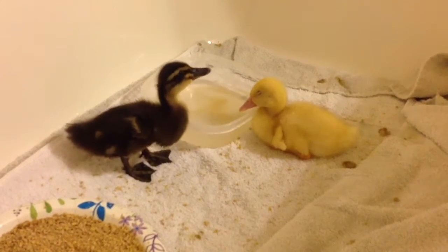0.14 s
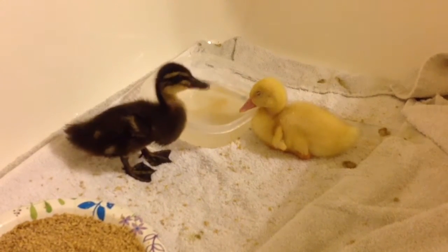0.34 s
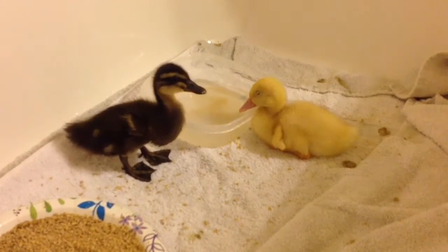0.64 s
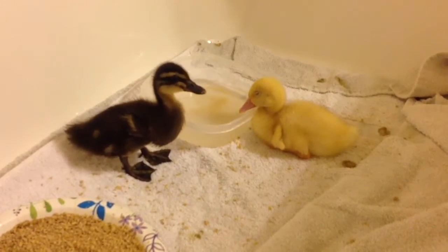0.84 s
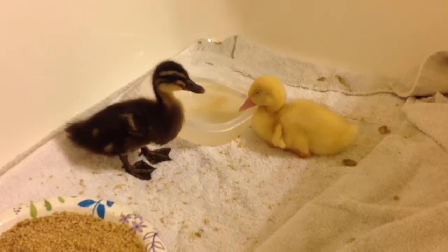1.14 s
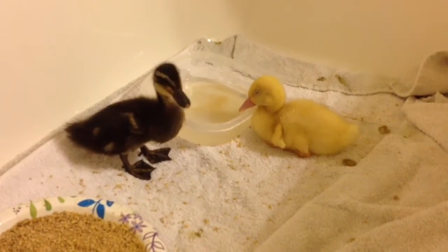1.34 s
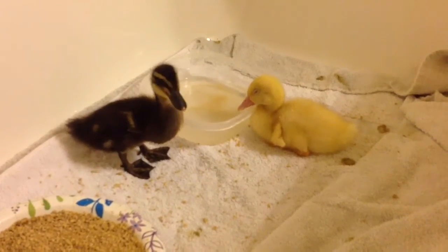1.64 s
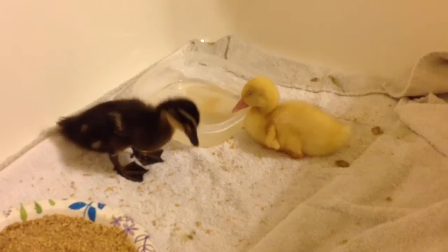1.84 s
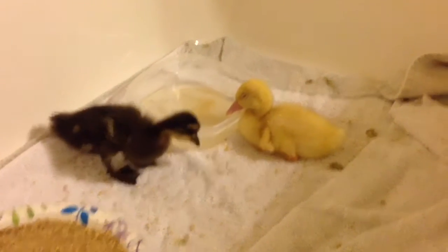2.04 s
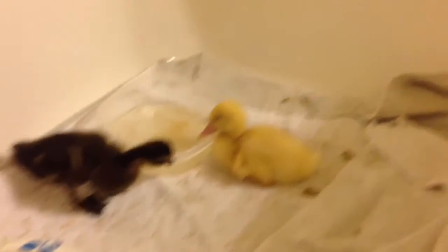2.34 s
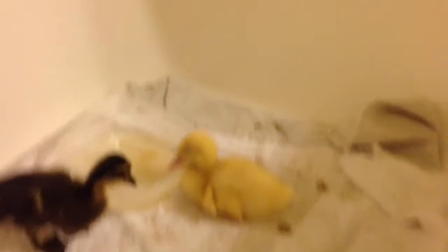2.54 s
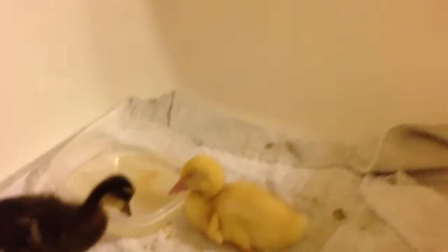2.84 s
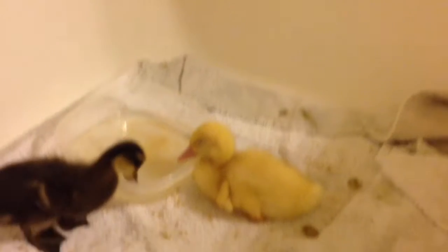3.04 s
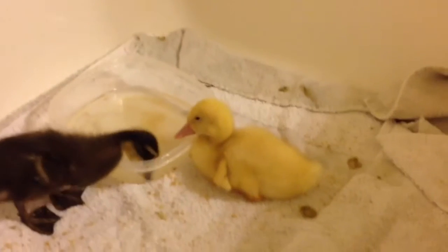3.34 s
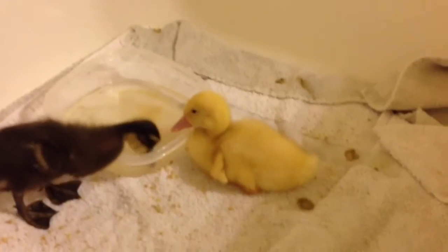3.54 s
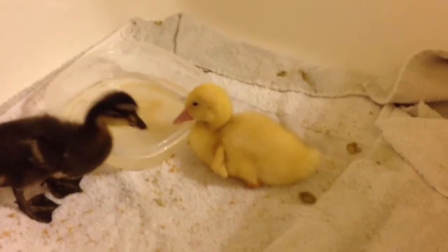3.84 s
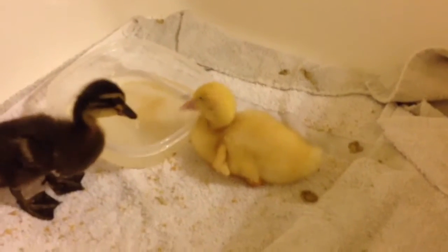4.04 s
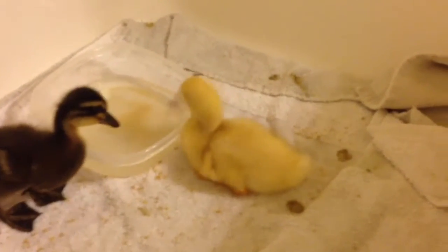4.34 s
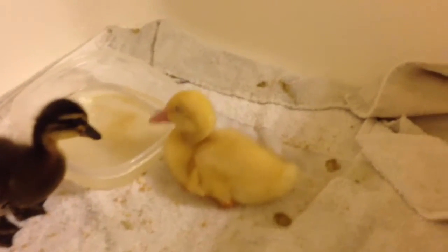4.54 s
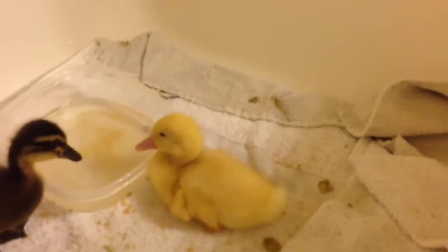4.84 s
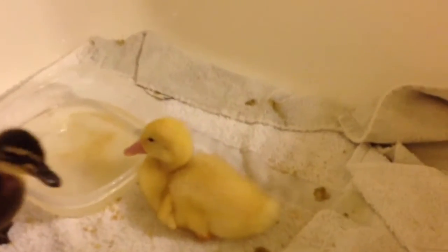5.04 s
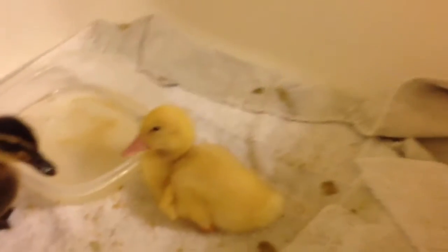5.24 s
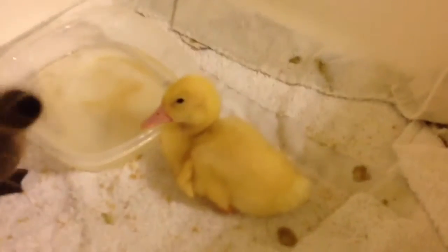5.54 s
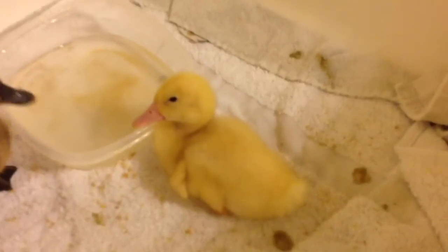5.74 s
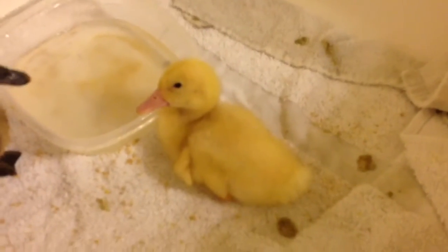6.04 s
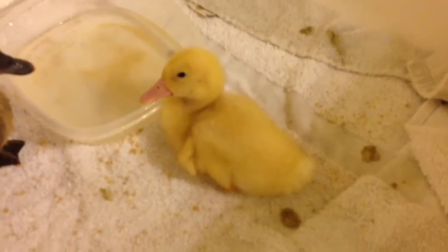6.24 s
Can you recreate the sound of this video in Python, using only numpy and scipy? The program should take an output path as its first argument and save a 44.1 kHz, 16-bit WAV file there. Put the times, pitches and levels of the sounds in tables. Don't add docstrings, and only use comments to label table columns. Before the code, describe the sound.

A duckling gives five quick high peeps in a small echoing tub, then a hard knock on a plastic dish and close cloth rubbing.

```python
import sys
import numpy as np
from scipy import signal
from scipy.io import wavfile
from scipy.ndimage import uniform_filter1d

SR = 44100
rng = np.random.default_rng(int(sys.argv[2]) if len(sys.argv) > 2 else 0)


def file_out(sig):
    cols = np.atleast_2d(sig).T
    lim = np.clip(cols, -1, 1)
    pcm = np.round(lim * 32767).astype(np.int16)
    wavfile.write(sys.argv[1], SR, pcm)


def gain_from_db(level_db):
    decades = np.asarray(level_db, float) / 20
    return 10 ** decades


N = 281622

# pitch_hz, t60_s
ROOM_DECAY = [(100, 0.48), (260, 0.69), (700, 0.49), (1840, 0.55), (3000, 0.49), (6000, 0.56),
              (12000, 0.54)]
# pitch_hz, level_db (per Hz)
HUSH_COLOUR = [(18, -53.5), (30, -29), (64, -18.5), (85, -27.5), (168, -5), (230, -10.5), (561, -13),
               (830, -18), (897, -18.5), (1970, -21), (3400, -21.5), (12900, -25), (15500, -29.5)]

# start_s, peak_db, pitch_hz
DRIPS = [(.3755, -45.5, 1640), (2.7654, -53, 2980), (2.8084, -51, 2160), (2.815, -30.5, 5320),
         (2.8684, -33, 4570), (2.8744, -30.5, 2840), (2.9203, -39, 2130), (2.9324, -41, 1900),
         (2.9716, -35, 3650), (2.9844, -36, 2970), (3.0021, -36, 2900), (3.0385, -39, 2250)]
# start_s, peak_db, pitch_hz
SCRAPES = [(4.0622, -43, 1330), (4.579, -43.5, 1130), (4.8296, -40.5, 1120), (4.909, -43, 1140),
           (4.9844, -42.5, 2870), (5.039, -46, 1010), (5.0844, -49, 3850), (5.2142, -40, 1300),
           (5.2641, -38.5, 1070), (5.2943, -38.5, 1450), (5.369, -42.5, 1760), (5.4244, -35, 1040),
           (5.482, -39, 1210), (5.5186, -41.5, 1120), (5.5453, -38.5, 7000), (5.5794, -35.5, 5000),
           (5.6993, -44, 1070), (5.416, -39, 1400), (5.64, -43, 1400)]
# start_s, peak_db, pitch_hz
TICKS = [(3.443, -56, 2340), (3.502, -42, 1430), (3.5982, -51, 4200), (3.6174, -53, 3020),
         (3.6213, -39, 5150), (3.6403, -44, 6850), (3.6716, -42, 2800), (3.6757, -41, 4890),
         (3.684, -38, 1330), (3.7065, -43, 5170), (3.7394, -47, 4420), (3.774, -43, 2210),
         (3.8398, -45, 2580), (3.8846, -39.5, 2640), (4.0392, -40, 2530)]

# start_s, length_s, level_db, push_db (extra mostly toward the end), overtone_db
PEEPS = [
    (1.325, .162, -42.5, 9, -.5),
    (1.624, .138, -37.3, 1, -.5),
    (1.908, .138, -39, -4, 2),
    (2.193, .137, -42.5, 2, 5),
    (2.468, .137, -35, -5, 0),
]
# scoop_s, first_top_hz, sag_hz, last_top_hz
TUNES = [
    (.04, 2800, 2350, 2794),
    (.028, 2927, 2630, 2876),
    (.028, 2905, 2810, 3030),
    (.033, 3160, 3030, 2870),
    (.029, 3234, 2900, 3242),
]
EFFORT_DB = [-13.5, -6.5, 0, -1, -4.5, -14]
SECOND_DB = [-21, -12, -26, -21, -15, -28]
PUSH_SHARE = [0, .15, 0, 0, .3, 1]
HUSK_DB = [3, 5, 1, -2, -5, -5]

# peak_s, swell_s, fade_s, peak_db, brightness_db
STROKES = [(2.065, .25, .09, -60.5, -1), (2.24, .035, .09, -57, -3), (2.41, .08, .1, -54, -1),
           (2.465, .2, .25, -54, 1.5), (2.69, .06, .04, -59, -3), (2.82, .03, .5, -69, 6),
           (3.075, .06, .02, -66, 0), (3.3, .05, .08, -64, -12), (3.39, .03, .25, -61, -13),
           (3.69, .3, .1, -61, -13), (3.82, .1, .15, -61, -9), (4.05, .03, .12, -56, -8),
           (4.16, .05, .15, -66, -18), (5.4, .15, .08, -55.5, -6), (5.5, .8, .3, -62, -16),
           (5.88, .2, .03, -70, -12)]
# time_s, pressure_db, brightness_db
DRAG = [
    (4.13, -70, 3),
    (4.34, -65, 0),
    (4.57, -62, 0),
    (4.85, -63, -1),
    (5.09, -57, 2),
    (5.19, -61, 0),
    (5.44, -59, 2),
    (5.58, -57, 4.5),
    (5.72, -63, 0),
    (5.765, -78, 0),
]
# offset_db, brightness_share
WEAVE = [(-1.5, -.55), (-.5, .2), (-6.3, .8), (-.5, 1.1)]
# pitch_hz, level_db (per Hz)
RUMBLE_COLOUR = [(60, -25.5), (110, -8), (160, -2.5), (260, -3), (450, -9), (700, -29.5)]
BODY_COLOUR = [(350, -23), (550, 2.5), (1050, 1.5), (1500, 2.5), (2200, -3.5), (2900, -3.5), (4000, -26),
               (6000, -33.5)]
SHEEN_COLOUR = [(1200, -16.5), (2200, -3), (3200, 2.5), (5000, -1.5), (6500, -7.5), (9000, -22.5)]
HISS_COLOUR = [(3000, -26), (5500, 0), (7200, 3.5), (10000, 0.5), (15500, -3)]
# start_s, peak_db, brightness_db (per octave)
SNAPS = [(2.0274, -49, 0), (2.2285, -37, -4.5), (2.246, -46, -5), (2.3124, -35, -2), (2.4047, -35, -0.5),
         (2.6497, -37.5, -1), (2.6708, -35, 2), (2.6925, -27, 0), (2.815, -43, 0), (2.8744, -48, 5),
         (2.9836, -47, 6)]
# start_s, peak_db, brightness_db (per octave)
CREAKS = [(3.3294, -51, 3), (3.3538, -48.5, 1), (3.4263, -46, -3), (3.472, -50.5, 4), (3.4883, -52, 0),
          (3.5004, -46, -8), (3.5214, -48, 2), (3.5458, -50.5, -8), (3.6124, -39, -3.5), (3.6391, -40, 0),
          (3.6857, -39, -3), (3.6928, -38, -2), (3.706, -38, 3), (3.7716, -41.5, 0), (3.7972, -35, 7),
          (3.8232, -37, -3.5), (3.8654, -55, 2.5), (4.034, -42, 0), (4.052, -39, 2.5), (4.079, -41, 1),
          (4.5232, -35.5, 0), (5.4834, -36, 0)]

# start_s, peak_db, pitch_hz
BUMPS = [(2.3, -47, 110), (2.695, -37.5, 190), (3.066, -54, 269), (3.383, -42.5, 185), (3.708, -44, 161),
         (3.866, -47, 156), (4.14, -48, 100), (5.903, -43, 227), (6.209, -40, 228)]

# start_s, peak_db, crack_db
KNOCKS = [
    (3.0908, -7, -14),
    (4.1205, -27, 0),
]
# first_pitch_hz, fall_s, t60_s
BENDS = [
    (1800, .0011, .011),
    (1100, .008, .014),
]
# pitch_hz, level_db
CRACK_COLOURS = [
    [(59, -38.5), (100, -3), (607, -5), (1460, -28.5), (1730, -12), (2230, -9), (3180, -21), (3390, -16),
     (5720, -17.5), (15000, -43.5)],
    [(120, -14), (200, -14), (647, -7), (1430, -20.5), (2800, -5), (5170, -17), (6300, -2), (8570, -21.5),
     (12500, -32), (15000, -23)],
]
# pitch_hz, level_db, t60_s
RINGS = [
    [(156, -27, .5), (247.5, -18, 0.06), (460, -31, 0.14)],
    [(673, -6, 0.065), (1384, -17, 0.059), (1825, -26, 0.18), (2900, -4, 0.013)],
]
TAIL_DB = [-8.5, -18]
# pitch_hz, level_db
TAIL_COLOURS = [
    [(59, -57), (100, -27.5), (155, -5), (320, -22), (353, -12), (507, -10.5), (1130, -18), (1300, -21),
     (3070, -26), (12000, -52), (15600, -87), (22000, -120)],
    [(120, -42), (200, -12), (496, -23), (641, -0.5), (829, -13), (919, -6), (1270, -9), (1890, -3.5),
     (2440, -18.5), (12000, -31), (15600, -53), (22000, -120)],
]


def evened(x):
    return x / np.sqrt(np.mean(x ** 2) + 1e-20)


def read(points, hz):
    f, value = np.transpose(points)
    return np.interp(np.log(hz + 1), np.log(f + 1), value)


def add(mix, start_s, sound):
    part = mix[round(start_s * SR):][:len(sound)]
    part += sound[:len(part)]


def decay(t, t60):
    return gain_from_db(-60 * t / t60)


def ring(hz, t60, size=2000):
    t = np.arange(size) / SR
    return np.sin(2 * np.pi * hz * t) * decay(t, t60)


def click(points, size=1024):
    log_gain = np.log(gain_from_db(read(points, abs(np.fft.fftfreq(size, 1 / SR)))))
    pulse = np.fft.ifft(np.exp(np.conj(signal.hilbert(log_gain)))).real
    return pulse[:size // 2] / abs(pulse).max()


def noise(points, patchy_db, flicker_db, size):
    hz, frames = np.fft.rfftfreq(size, 1 / SR), 4 * N // size + 5
    a, b, patches = rng.standard_normal((frames, len(hz), 3)).T
    patches = uniform_filter1d(patches, size=6, axis=0)
    patches = evened(uniform_filter1d(patches, size=8, axis=1))
    flicker = evened(uniform_filter1d(rng.standard_normal(frames), size=4))
    level_db = read(points, hz)[:, None] + patchy_db * patches + flicker_db * flicker
    spectra = (a + 1j * b) * gain_from_db(level_db)
    return evened(signal.istft(spectra, nperseg=size, noverlap=3 * size // 4)[1][:N])


def room(x, wet_db):
    taps = np.zeros(SR)
    at = np.arange(120, SR - 20, 20)
    taps[at + rng.integers(0, 20, len(at))] = rng.choice([-1., 1.], len(at))
    hz, t, spectra = signal.stft(taps, SR, nperseg=256)
    tail = signal.istft(spectra * decay(t, read(ROOM_DECAY, hz)[:, None]), SR, nperseg=256)[1]
    tail *= 1 + 3.0 * decay(np.arange(len(tail)) / SR, 0.034)
    return signal.fftconvolve(x, gain_from_db(wet_db) * tail / np.linalg.norm(tail))[:N]


def hush():
    hum = gain_from_db(-83.5) * np.sqrt(2) * np.sin(2 * np.pi * 60 * np.arange(N) / SR)
    air_hz, air_width_hz = 167.9, 7
    peak = signal.iirpeak(air_hz, air_hz / air_width_hz, SR)
    air = gain_from_db(-72.5) * evened(signal.lfilter(*peak, rng.standard_normal(N)))
    return gain_from_db(-66) * noise(HUSH_COLOUR, patchy_db=0.68, flicker_db=0.22, size=2048) + air + hum


def drops(rows, t60, tick_db, start_share, wet_db):
    out, t = np.zeros(N), np.arange(2000) / SR
    for start_s, db, hz in rows:
        tick = uniform_filter1d(rng.standard_normal(2000), size=12) * gain_from_db(tick_db + 13) * decay(t, 0.0059)
        rising_hz = hz * (1 - (1 - start_share) * np.exp(-t / 0.00056))
        turn = 2 * np.pi * np.cumsum(rising_hz) / SR
        bubble = np.sin(turn) * decay(t, t60) * (1 - np.exp(-t / 0.00075))
        add(out, start_s, gain_from_db(db) * (1.01 * bubble + tick * np.cos(turn)))
    return out + room(out, wet_db)


def peep(length, db, push_db, overtone_db, scoop, top_hz, sag_hz, last_hz):
    held = length - scoop - .017
    turns_s = np.array([0, scoop, scoop + .34 * held, scoop + .62 * held, scoop + held, length])
    lift_hz = sag_hz + .3 * (last_hz - sag_hz)
    pitch_hz = [.6 * top_hz, top_hz, sag_hz, lift_hz, last_hz, 1480]
    t = np.arange(0, length, 1 / SR)
    waver, husk = rng.standard_normal((2, len(t)))

    def follow(values):
        return np.interp(t, turns_s, values)

    places = np.arange(len(turns_s))
    step, part = np.divmod(follow(places), 1)
    eased = .5 - .5 * np.cos(np.pi * part)
    eased = np.where(step == 0, np.sin(np.pi / 2 * part), eased)
    eased = np.where(step == len(places) - 2, 1 - np.cos(np.pi / 2 * part), eased)
    hz = np.interp(step + eased, places, pitch_hz)
    hz *= 1 + 0.0064 * evened(uniform_filter1d(waver, size=200))
    turn = 2 * np.pi * np.cumsum(hz) / SR
    side_turn = 2 * np.pi * np.cumsum(hz + 802) / SR

    upper = gain_from_db(-16.5) * (np.sin(3 * turn) + 0.61 * np.sin(4 * turn))
    overtones = gain_from_db(overtone_db + follow(SECOND_DB)) * (np.sin(2 * turn) + upper)
    tone = np.sin(turn) + overtones
    husk = evened(uniform_filter1d(husk, size=70))
    husky = gain_from_db(-26 + overtone_db + follow(HUSK_DB)) * (husk + .5) * np.sin(side_turn)
    husky *= signal.windows.tukey(len(t), .4)
    level = np.sqrt(2) * gain_from_db(db + follow(EFFORT_DB) + push_db * follow(PUSH_SHARE))
    level *= signal.windows.tukey(len(t), .08)
    return level * tone, level * husky


def duckling():
    voice, husk = np.zeros((2, N))
    for (start_s, *force), tune in zip(PEEPS, TUNES):
        tone, husky = peep(*force, *tune)
        add(voice, start_s, tone)
        add(husk, start_s, husky)
    low_pass = signal.butter(3, 2050, fs=SR, output="sos")
    spill = gain_from_db(4) * signal.sosfiltfilt(low_pass, voice)
    return voice + room(voice + spill, -2.6) + husk


def grains(low_hz, high_hz, cycles):
    size = gain_from_db(2.8 * np.minimum(rng.exponential(1, N), 4)) * (rng.random(N) < 240 / SR)
    kind = rng.integers(0, 8, N)
    out = np.zeros(N)
    for k, hz in enumerate(np.geomspace(low_hz, high_hz, num=8)):
        out += signal.oaconvolve(size * (kind == k), ring(hz, cycles / hz))[:N]
    return evened(out)


def cloth():
    t = np.arange(N) / SR
    drag_s, drag_db, drag_bright = np.transpose(DRAG)
    moves = [(np.interp(t, drag_s, drag_db, -120, -120), np.interp(t, drag_s, drag_bright))]
    for peak_s, swell, fade, db, bright in STROKES:
        moves.append((db - 20 * np.maximum((peak_s - t) / swell, (t - peak_s) / fade), bright))
    rumble = noise(RUMBLE_COLOUR, 2.9, 1.1, size=1024)
    body = noise(BODY_COLOUR, 2.2, 0.8, size=256) + gain_from_db(-7.5) * grains(640, 2500, cycles=2.7)
    sheen = noise(SHEEN_COLOUR, 2.4, 1.0, size=256) + gain_from_db(-7.5) * grains(2190, 6000, cycles=5.3)
    hiss = noise(HISS_COLOUR, 2.0, 1.2, size=256) + gain_from_db(-11.5) * grains(7000, 14000, cycles=4.2)
    judder = gain_from_db(2.2 * evened(uniform_filter1d(rng.standard_normal(N), size=500)))
    layers = rumble, body * judder, 1.88 * sheen * judder, 1.3 * hiss
    out = np.zeros(N)
    for layer, (offset_db, share) in zip(layers, WEAVE):
        levels = [gain_from_db(db + offset_db + share * bright) for db, bright in moves]
        out += layer * np.max(levels, axis=0)
    return out


def snaps():
    out, t = np.zeros(N), np.arange(300) / SR
    for start_s, db, tilt_db in SNAPS + CREAKS:
        tilt_db = np.clip(tilt_db, -5, 6)
        crackle = rng.standard_normal(300) * decay(t, 0.004)
        snap = np.convolve(crackle, click([(200, -36), (1000, -3 * tilt_db), (16000, tilt_db)]))
        add(out, start_s, gain_from_db(db) * snap / abs(snap).max())
    return out + room(out, -10)


def bumps():
    out = np.zeros(N)
    for start_s, db, hz in BUMPS:
        add(out, start_s, gain_from_db(db) * (1.13 * ring(hz, 4.1 / hz) + 0.38 * ring(3.4 * hz, 0.0043)))
    return out


def knocks():
    out, blows, t = np.zeros(N), np.zeros(N), np.arange(2000) / SR
    rows = zip(KNOCKS, BENDS, CRACK_COLOURS, RINGS, TAIL_DB, TAIL_COLOURS)
    for (start_s, db, crack_db), (first_hz, fall, bend_t60), colour, modes, tail_db, tail in rows:
        turn = 2 * np.pi * np.cumsum(first_hz / (1 + t / fall)) / SR
        bend = np.sin(turn) * decay(t, bend_t60) * (1 - np.exp(-t * 3500))
        pulse = click(colour)
        pulse = pulse - 0.32 * np.roll(pulse, 1)
        crack = np.convolve(rng.standard_normal(2000) * decay(t, 0.01), pulse)
        add(out, start_s, gain_from_db(db) * bend)
        add(out, start_s, gain_from_db(db + crack_db) * crack / abs(crack).max())
        for hz, mode_db, t60 in modes:
            add(out, start_s, gain_from_db(db + mode_db) * ring(hz, t60, size=25000))
        add(blows, start_s, gain_from_db(tail_db) * click(tail))
    return out + room(blows, 0)


def scene():
    drips = drops(DRIPS, t60=.012, tick_db=-11, start_share=.8, wet_db=-3)
    scrapes = drops(SCRAPES, t60=.014, tick_db=-6, start_share=.88, wet_db=-4)
    ticks = drops(TICKS, t60=.008, tick_db=-9, start_share=.88, wet_db=-22)
    near = drips + scrapes + ticks + duckling() + cloth() + snaps() + bumps() + knocks()
    port = signal.butter(4, 95, "high", fs=SR, output="sos")
    mono = signal.sosfilt(port, near) + hush()
    return np.array([mono, mono])


def top_cut(x):
    return signal.sosfilt(signal.butter(12, 16130, fs=SR, output="sos"), x)


def record(dry):
    low_pass = signal.firwin(511, 15500, window=("kaiser", 9), fs=SR)
    limited = signal.oaconvolve(dry, low_pass[None], "same")
    return top_cut(limited)


dry = scene()
out = record(dry)
file_out(out)
```